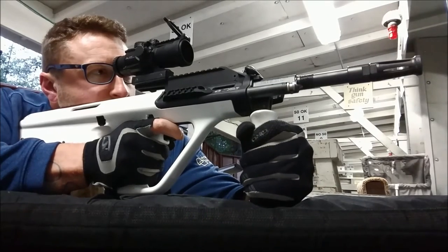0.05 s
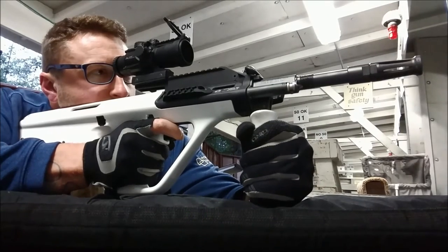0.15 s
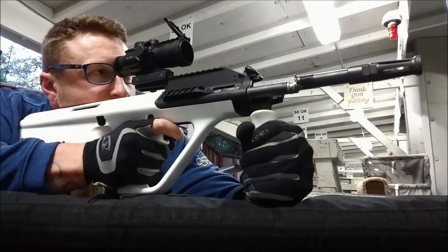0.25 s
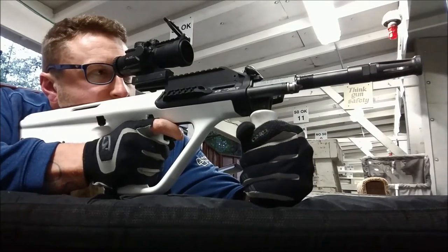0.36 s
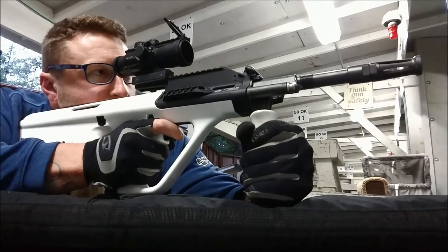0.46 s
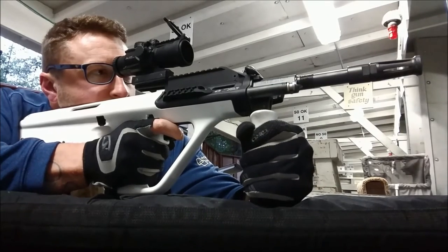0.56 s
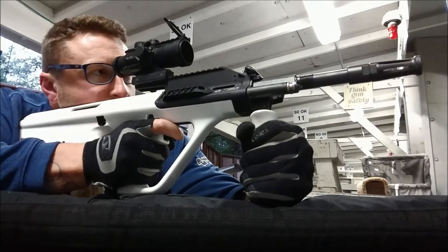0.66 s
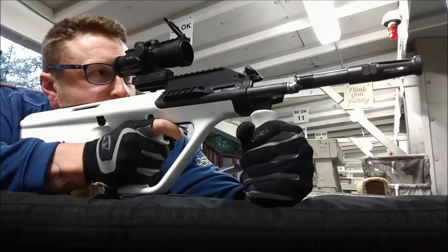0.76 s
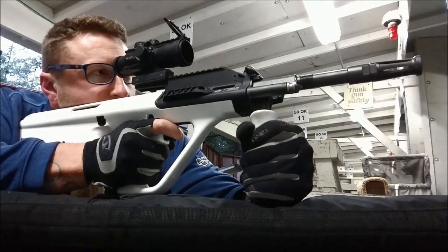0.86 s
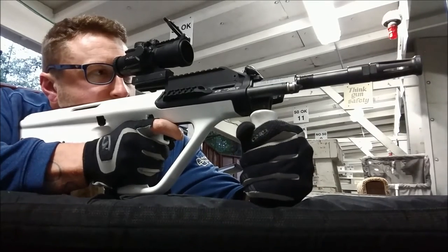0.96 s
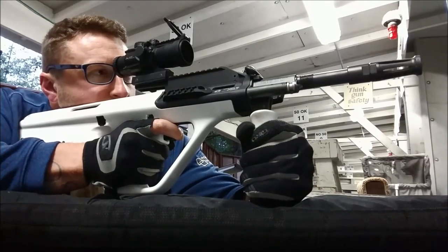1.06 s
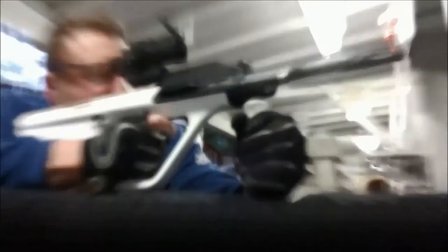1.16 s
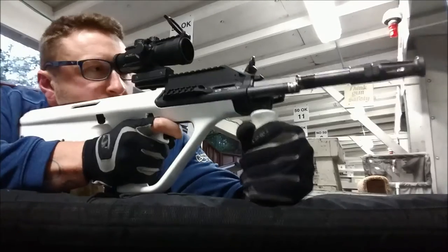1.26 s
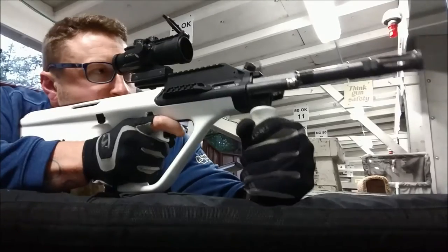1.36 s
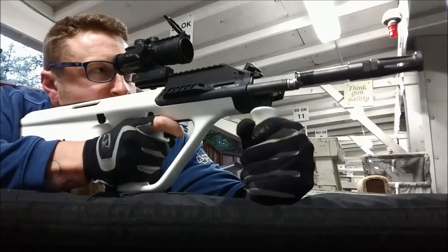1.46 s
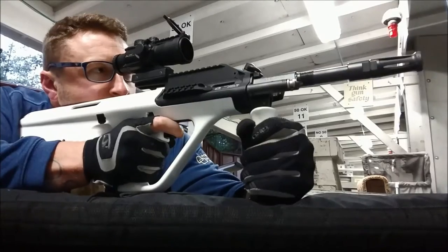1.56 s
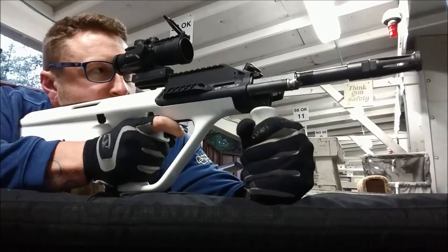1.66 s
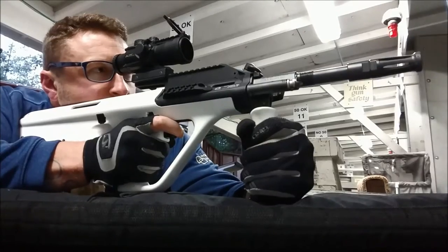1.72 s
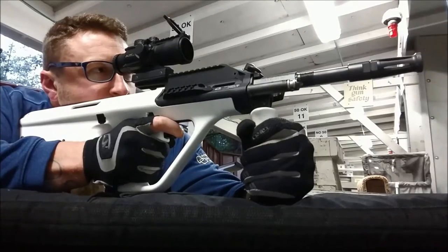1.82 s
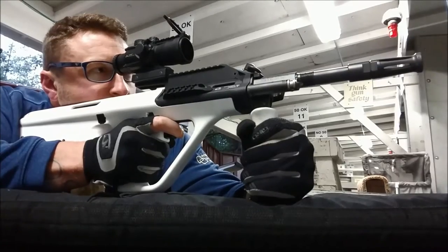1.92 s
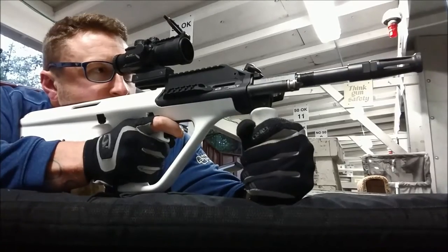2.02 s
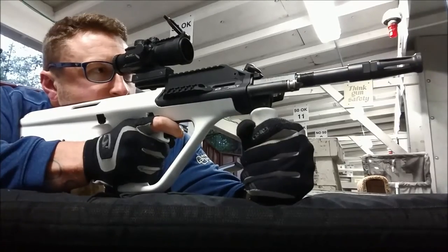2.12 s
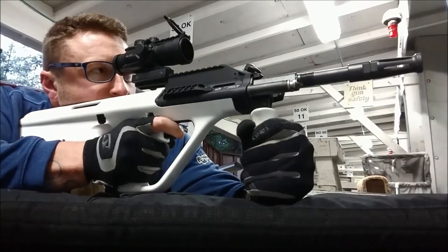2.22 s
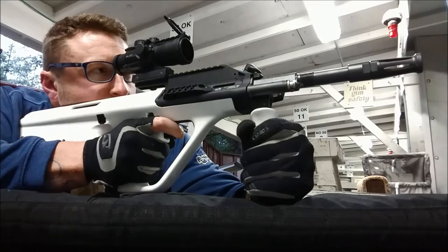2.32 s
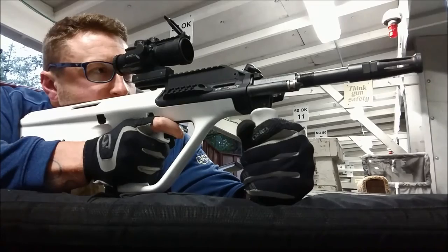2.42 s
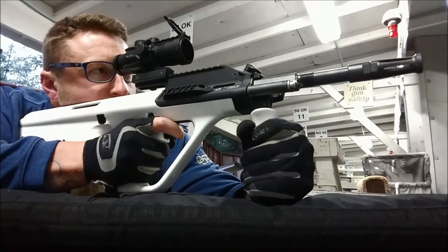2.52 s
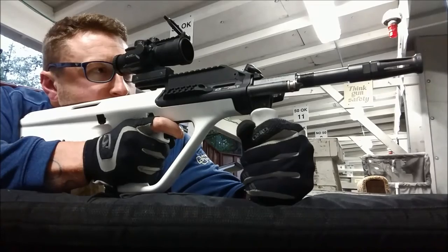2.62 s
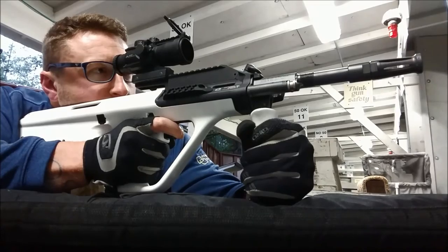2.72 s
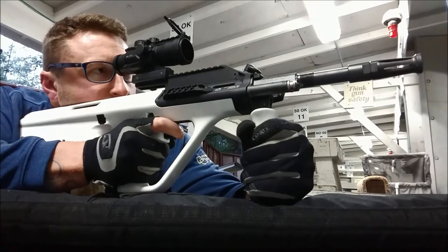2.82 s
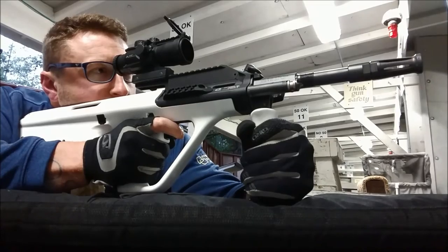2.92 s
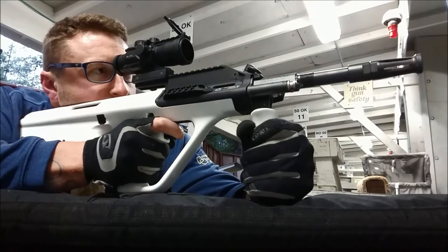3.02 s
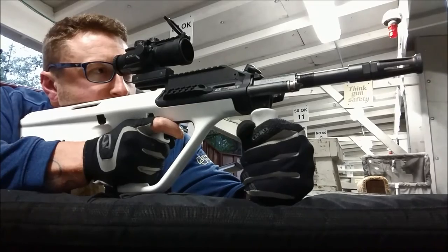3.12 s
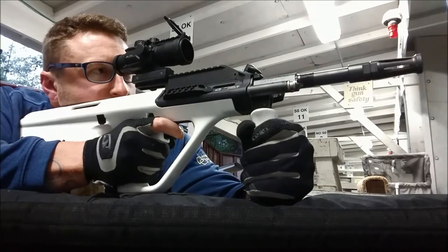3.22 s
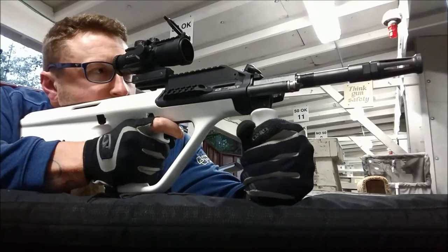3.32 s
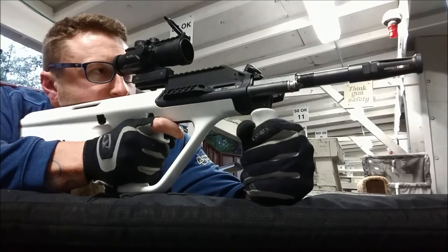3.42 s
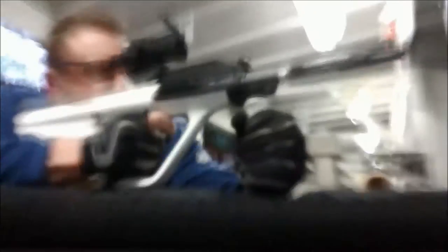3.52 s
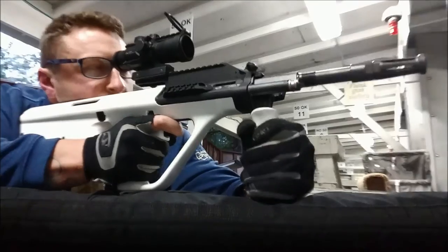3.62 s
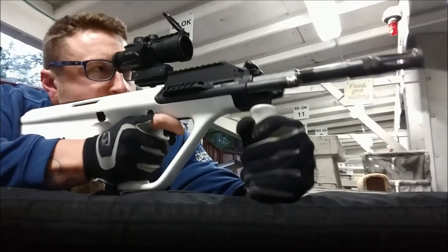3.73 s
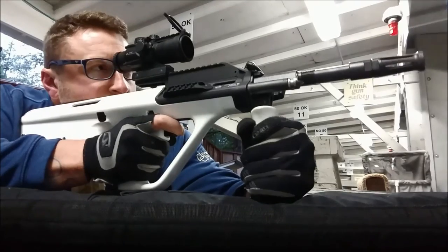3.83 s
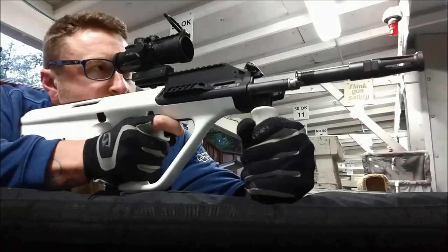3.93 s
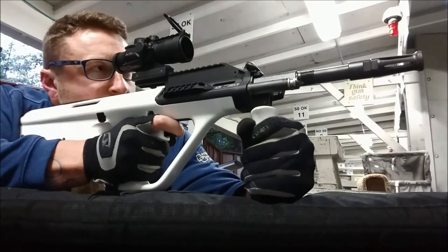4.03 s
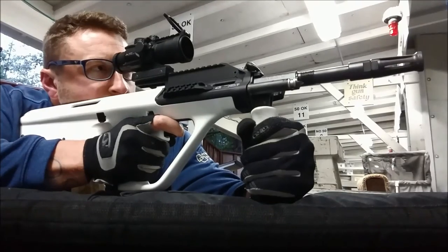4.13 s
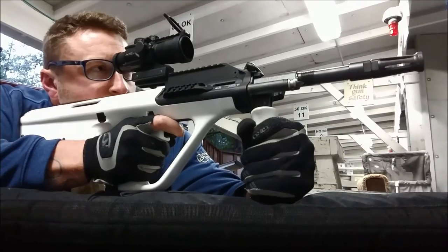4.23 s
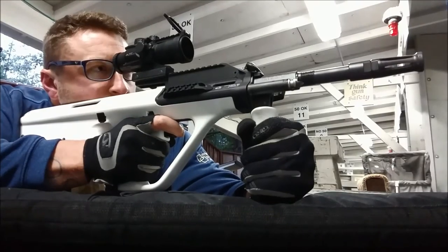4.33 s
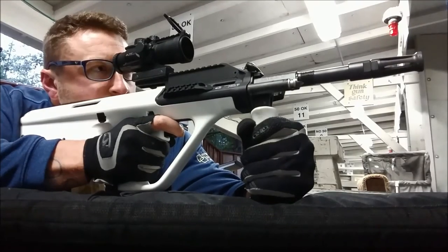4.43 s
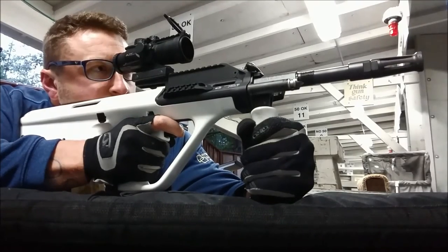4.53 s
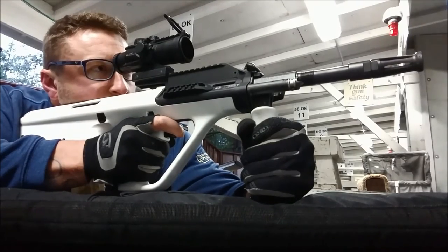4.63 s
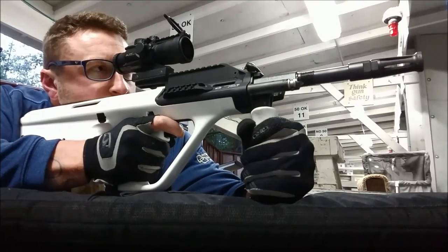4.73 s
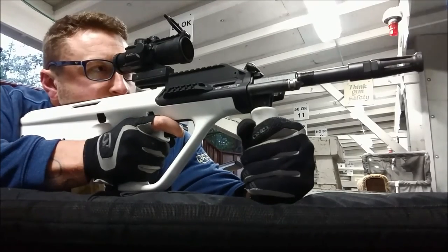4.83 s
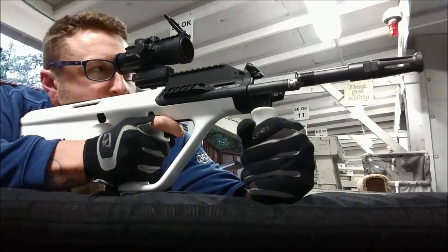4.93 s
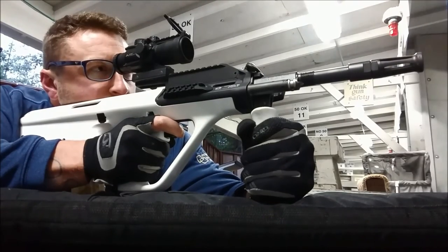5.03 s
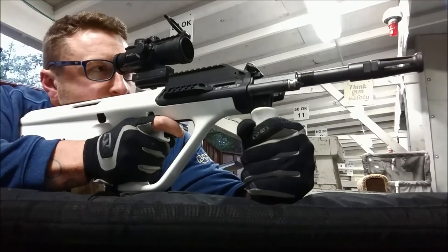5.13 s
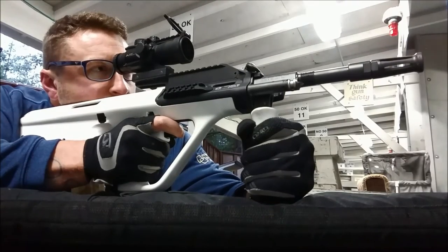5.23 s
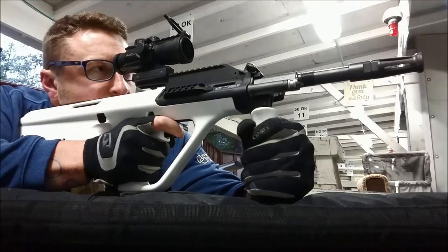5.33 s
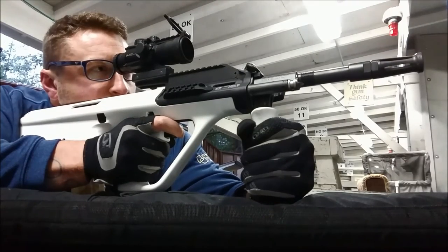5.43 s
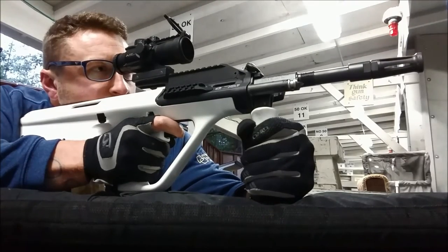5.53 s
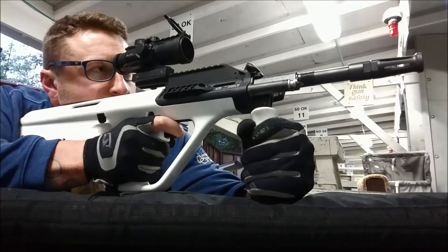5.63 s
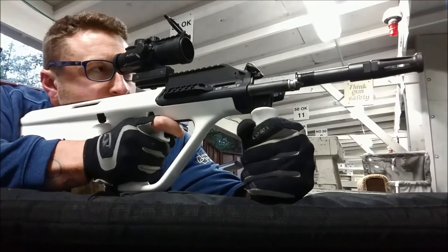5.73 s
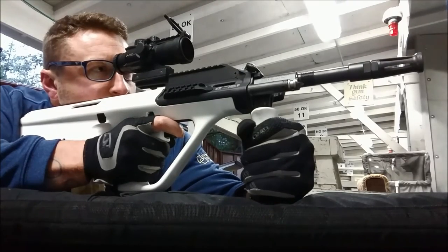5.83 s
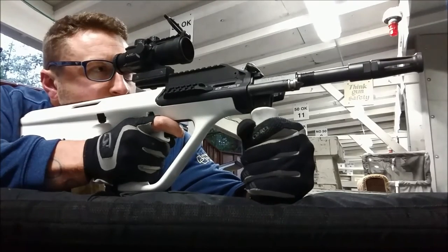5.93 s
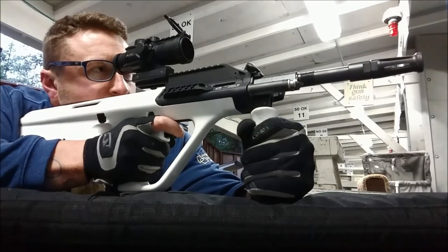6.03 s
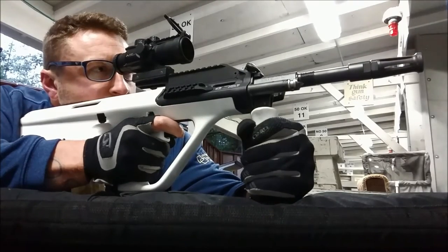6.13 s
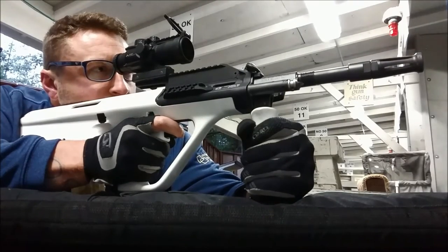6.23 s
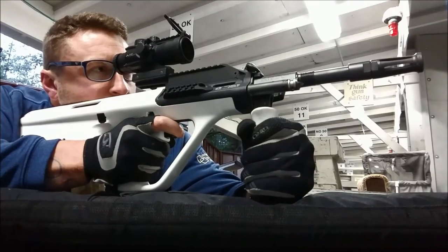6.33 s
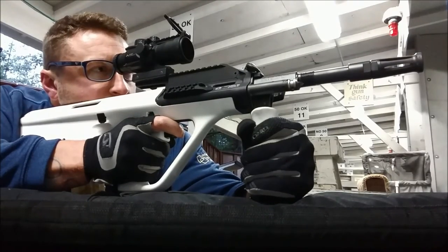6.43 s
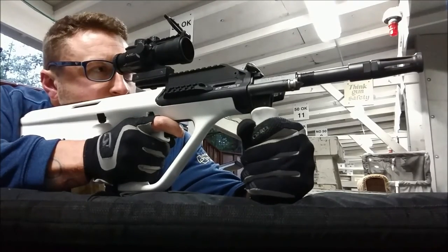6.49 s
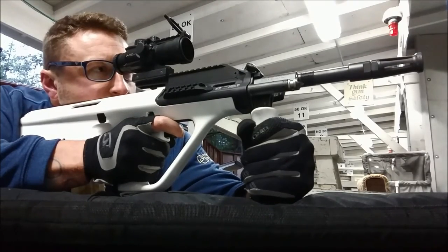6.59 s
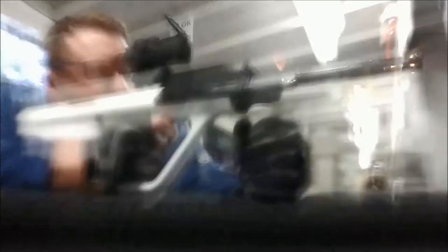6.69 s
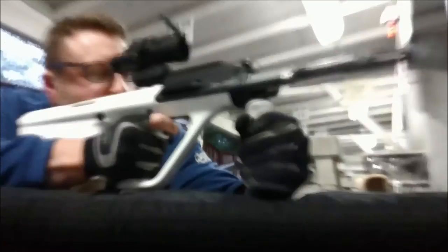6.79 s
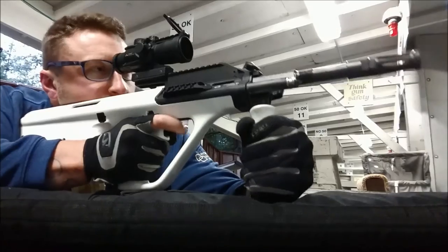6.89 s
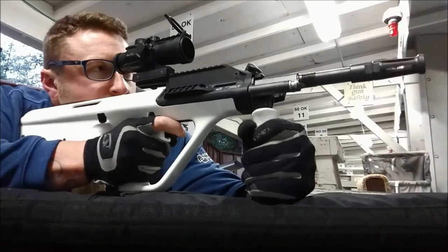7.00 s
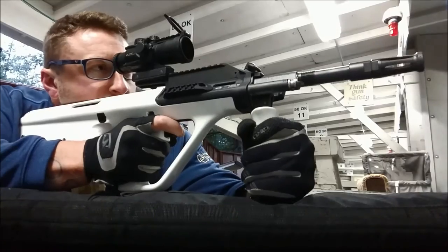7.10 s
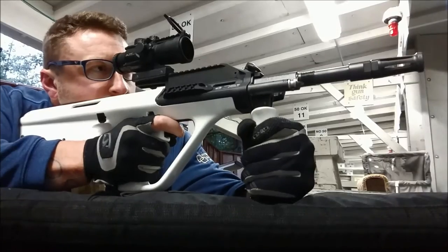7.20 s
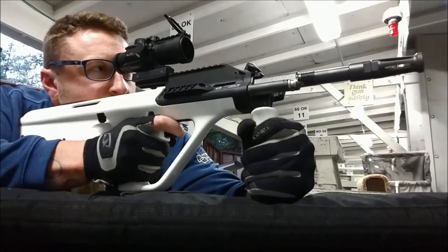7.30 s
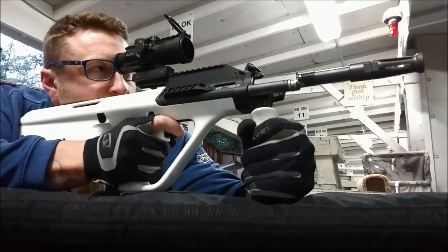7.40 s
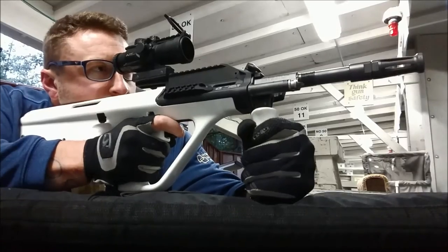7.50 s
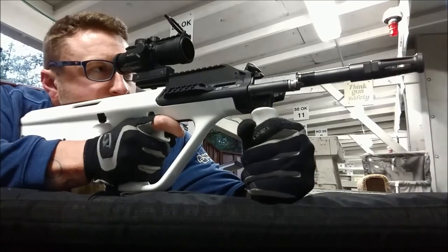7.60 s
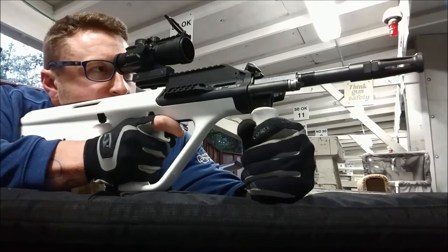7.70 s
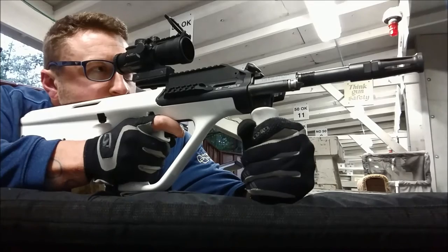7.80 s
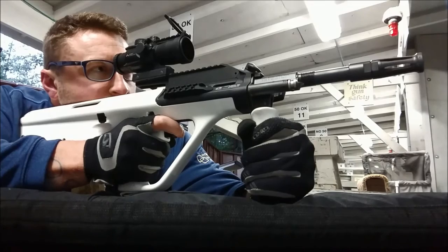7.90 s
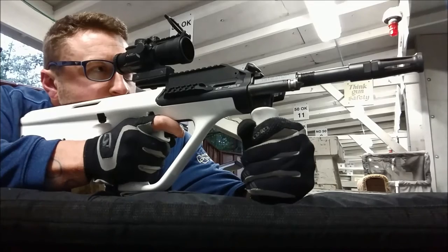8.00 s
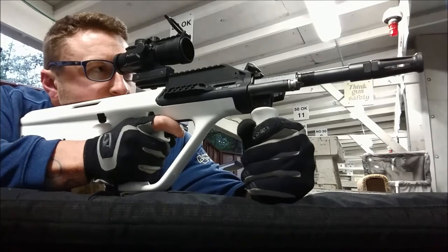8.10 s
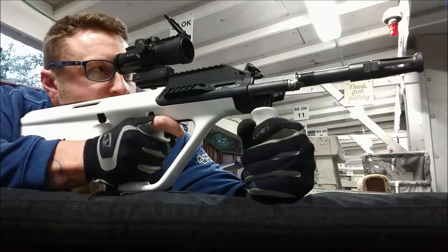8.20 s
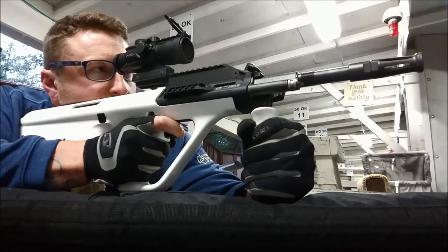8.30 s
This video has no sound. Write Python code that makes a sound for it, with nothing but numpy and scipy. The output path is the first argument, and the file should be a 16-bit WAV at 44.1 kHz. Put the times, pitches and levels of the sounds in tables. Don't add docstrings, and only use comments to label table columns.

```python
import sys
import numpy as np
from scipy import signal
from scipy.fft import rfft, irfft, next_fast_len
from scipy.io import wavfile
from scipy.ndimage import map_coordinates

SR = 44100
rng = np.random.default_rng(int(sys.argv[2]) if len(sys.argv) > 2 else 0)


def ratio_of_db(decibels):
    return 10 ** (np.asarray(decibels, float) / 20)


def wav_record(signal):
    frames = np.transpose(np.atleast_2d(signal))
    bounded = np.clip(frames, -1, 1)
    quanta = np.round(bounded * 32767).astype(np.int16)
    wavfile.write(sys.argv[1], SR, quanta)


N = 368235
LEFT_LAG_S = 18.5 / SR

# (time [s], charge level [dB], left capsule wakes after the shot [s])
SHOTS = [
    (-0.95, 0, 0.11),
    (1.1615, 0, 0.111),
    (3.542, 0, 0.122),
    (6.7592, 1, 0.114),
]
# (time after ignition [s], level [dB], half length [s], sign, left minus right [dB])
BLAST = [
    (0.0006, -17, 0.0003, 1, -4),
    (0.0018, -14, 0.0003, -1, -4),
    (0.0031, 10, 0.0006, -1, 0),
    (0.0038, 13, 0.0011, 1, 0),
    (0.0058, 20, 0.0004, 1, -2),
    (0.0078, 10, 0.00025, 1, -12),
    (0.0101, 6, 0.0003, 1, -14),
    (0.0134, 8, 0.0004, 1, 2),
]
# (time after ignition [s], pitch [Hz], cycles, level [dB], left minus right [dB])
SLAPS = [(0.144, 1900, 2.5, -6, 2), (0.15, 620, 2.5, 1, 3), (0.187, 500, 1.5, -5, 4),
         (0.125, 900, 2, -1, -4), (0.2, 120, 7, -12, 0), (0.2395, 1500, 2.2, 5, 7),
         (0.2435, 300, 0.8, -4, 6), (0.2395, 4300, 4, -3, 4), (0.277, 8000, 1.5, -17, 3),
         (0.287, 12000, 1.5, -17, -6), (0.25, 48, 5, -18, 0), (0.585, 150, 5, -28, 0)]
# (frequency [Hz], level [dB per Hz])
ROOF_TONE = [(18, -40), (40, -13), (125, -1), (206, -7), (359, -5), (620, -4), (1150, -12), (1890, -18),
             (4300, -27), (8000, -30), (12500, -29), (15500, -38), (16500, -60)]
# (frequency [Hz], level [dB per Hz])
FIELD_TONE = [(18, -31), (45, -4), (86, -20), (150, -2), (300, -13), (625, -10), (850, -10), (1050, -19),
              (1400, -15), (2100, -18), (4400, -24), (4800, -30), (13400, -54), (16500, -76)]
# (frequency [Hz], roof t60 [s], field t60 [s])
DECAY = [(40, 0.9, 1.4), (120, 0.62, 2.4), (400, 0.54, 2.9), (1200, 0.57, 2.7), (4000, 0.55, 1.7),
         (9000, 0.55, 0.95), (16000, 0.38, 0.55)]
# (frequency [Hz], share [0-1])
ALIKE = [(50, 0.85), (150, 0.9), (350, 0.75), (800, 0.42), (1800, 0.35), (5000, 0.2), (15000, 0.2)]
# (frequency [Hz], left minus right [dB])
LEAN = [(60, 0.0), (110, -0.5), (200, -1.0), (380, -0.5), (700, -0.5), (1290, 1.5), (2380, -5.0),
        (4400, -4.5), (8120, 1.5), (15000, 0.5)]
# (time after shot [s], pitch [Hz], cycles, level [dB], left minus right [dB])
NEIGHBOUR_SLAPS = [
    (0.004, 600, 2.4, 3, -3),
    (0.009, 2600, 6, -11, -2),
    (0.012, 70, 1.2, -15, 0),
    (0.0185, 6000, 1.2, -2, 3),
    (0.0175, 3500, 2, -5, 0),
    (0.021, 600, 2, -2, 0),
    (0.04, 700, 4, -5, -2),
    (0.06, 9000, 1.5, -6, 3),
    (0.09, 4500, 1.5, -9, 2),
    (0.109, 6000, 1.3, -8, 2),
]
# (frequency [Hz], level [dB per Hz])
NEIGHBOUR_TONE = [(18, -44), (30, -18), (196, -6), (420, -6), (680, -2), (953, -7), (1490, -9), (3000, -17),
                  (12300, -27), (15200, -34), (16500, -51)]
# (time [s], strength [dB], low over high ring [dB]: up on its mouth, down on its base)
BOUNCES = [(0.0034, -47, -4), (0.0744, -54, -3), (0.2034, -56, -3), (1.786, -28, -15), (1.8542, -44, -14),
           (2.124, -48, -17), (2.148, -47, -22), (2.1844, -51, -28), (2.277, -44, -17), (4.1839, -34, -3),
           (4.2048, -35, -2), (4.4318, -55, -8), (4.4767, -36, -22), (4.5326, -43, -26), (4.6159, -57, -23),
           (4.6794, -36, -17), (4.6877, -30, -26), (4.8958, -52, -17), (4.9621, -48, 12), (4.995, -48, 11),
           (5.0394, -53, 1), (5.2265, -62, -1), (5.3094, -60, 0), (7.4031, -31, 5), (7.4145, -28, 8),
           (8.076, -58, -6), (8.1384, -54, -15), (8.1753, -52, -18), (8.313, -50, -8)]
# (frequency [Hz], level [dB], t60 [s])
LOW_RING = [(10620, -2, 0.33), (10770, 0, 0.3), (10930, -12, 0.25)]
# (frequency [Hz], level [dB], t60 [s])
HIGH_RING = [(14860, -12, 0.24), (14950, -8, 0.3), (15050, 0, 0.26), (15170, -8, 0.3), (15310, -12, 0.2)]
# (frequency [Hz], level [dB], t60 [s])
BENCH_RING = [(1350, -4, 0.4), (1850, -3, 0.35), (2315, -5, 0.5), (2546, 1, 0.35), (3080, 1, 0.3),
              (4673, -11, 0.65), (4953, -12, 0.35), (5620, -3, 0.4), (6272, -7, 0.45), (6783, -9, 0.45),
              (7994, -6, 0.12), (9022, -8, 0.14)]
# (time [s], centre [Hz], length [s], level [dB])
RUSTLES = [(0.675, 9000, 0.012, -70), (1.14, 1400, 0.006, -48), (2.6, 2500, 0.01, -68),
           (2.76, 2100, 0.01, -64), (2.99, 2800, 0.016, -62), (3.05, 5500, 0.04, -70),
           (3.33, 3000, 0.01, -60), (3.523, 1500, 0.004, -42), (6.11, 2500, 0.02, -66),
           (6.32, 600, 0.07, -62), (6.33, 2600, 0.07, -70), (6.38, 70, 0.09, -56), (5.6, 75, 0.2, -60),
           (6.56, 6000, 0.022, -67), (6.741, 1100, 0.005, -37)]
# (time [s], pitch [Hz], cycles, level [dB], left minus right [dB])
SQUEAKS = [
    (5.725, 2150, 90, -64, 0),
    (5.985, 1500, 12, -58, 0),
]
# (frequency [Hz], level [dB per Hz])
AIR_TONE = [(18, -12), (40, 2), (120, 0), (200, -5), (400, -10), (800, -12), (1050, -19), (2000, -22),
            (3200, -30), (5000, -35), (8000, -36), (13000, -31), (15500, -33), (16500, -55)]
# (time after ignition [s], pitch [Hz], cycles, level [dB], left minus right [dB])
SQUEAL = [
    (0.004, 12500, 8, -9, 0),
    (0.0052, 14000, 8, -11, -4),
    (0.0845, 15300, 20, -36, -40),
    (0.086, 12500, 12, -33, -40),
    (0.0875, 14500, 10, -35, -40),
]


def read(table, hz):
    x, *columns = np.transpose(table)
    return [np.interp(np.log(hz), np.log(np.maximum(x, 1)), c) for c in columns]


def add(out, x, at_s, pan_db=0):
    mono = x.ndim == 1
    for ch, (lag_s, sign) in enumerate([(LEFT_LAG_S, 1), (0, -1)]):
        one = x if mono else x[ch]
        start = int(round((at_s + (lag_s if mono else 0)) * SR))
        a, b = np.clip([start, start + len(one)], 0, out.shape[1])
        out[ch, a:b] += one[a - start:b - start] * ratio_of_db(sign * pan_db / 2)


def diffuse(size):
    hz = np.maximum(np.arange(size // 2 + 1) * SR / size, 1)
    both, left, right = rfft(rng.standard_normal((3, size)))
    share = np.clip(read(ALIKE, hz)[0], 0, 1)
    lean = ratio_of_db(read(LEAN, hz)[0] / 2)
    late = np.exp(-2j * np.pi * hz * LEFT_LAG_S)
    shared = both * np.array([late * lean, 1 / lean])
    own = np.array([left * lean, right / lean])
    return np.sqrt(share) * shared + np.sqrt(1 - share) * own


def colour(table, hz):
    gain = ratio_of_db(read(table, hz)[0])
    return gain[:, None] / np.sqrt(np.mean(gain ** 2))


def shape(spectrum, gain):
    hz, t, frames = signal.stft(irfft(spectrum), SR, nperseg=1024)
    return signal.istft(frames * gain(np.maximum(hz, 1), t), SR, nperseg=1024)[1]


def space(noise, tone, roof_db, field_db, hold_s=0, quick=1, rise_s=0.007):
    def gain(hz, t):
        roof_s, field_s = np.array(read(DECAY, hz))[:, :, None]
        roof = colour(tone, hz) * ratio_of_db(roof_db - 60 * np.maximum(t - hold_s, 0) / roof_s / quick)
        field = colour(FIELD_TONE, hz) * ratio_of_db(field_db - 60 * (t - 0.5) / field_s)
        return np.hypot(roof, field * (1 - np.exp(-(t / 0.15) ** 2)))
    out = shape(noise, gain)
    age = np.maximum(np.arange(out.shape[1]) / SR - 0.003, 0)
    return out * (1 - np.exp(-age / rise_s))


def slap(out, at_s, rows):
    for s, hz, cycles, db, pan_db in rows:
        half = cycles / hz / 2
        t = np.arange(-3 * half, 3 * half, 1 / SR)
        burst = -ratio_of_db(db) * np.exp(-(t / half) ** 2) * np.cos(2 * np.pi * hz * t)
        add(out, burst, at_s + s - 3 * half, pan_db)


def ring(modes, db, chance, size=13000):
    hz, mode_db, t60 = np.transpose(modes)[:, :, None]
    t = np.arange(size) / SR
    chance = chance[:len(modes)]
    level = ratio_of_db(mode_db + 2.5 * chance[:, :1] - 60 * t / t60)
    lines = level * np.sin(2 * np.pi * hz * (1 + 0.0015 * chance[:, 1:2]) * t)
    return ratio_of_db(db) * lines.sum(axis=0) * (1 - np.exp(-t / 0.003))


def tick(db, lo_hz, t60, size=8820):
    t = np.arange(size) / SR
    noise = signal.lfilter(*signal.butter(2, lo_hz, "high", fs=SR), rng.standard_normal((2, size)))
    return noise * (ratio_of_db(db + 5 - 60 * t / t60) + ratio_of_db(db + 9 - 60 * t / 0.012))


def air(count=80, channels=12):
    level_db, flutter_db = -55, 3.0
    steps = rng.standard_normal((channels, count))

    def gain(hz, t):
        band = np.log2(np.maximum(hz / 40, 1)) * 1.3
        place = np.meshgrid(band, t / t[-1] * (count - 1), indexing="ij")
        flutter = map_coordinates(steps, place, order=1, mode="nearest")
        depth_db = flutter_db * np.minimum(1, 600 / hz)[:, None]
        return colour(AIR_TONE, hz) * ratio_of_db(level_db + depth_db * flutter)
    return shape(diffuse(next_fast_len(N + N % 2, True)), gain)[:, :N].copy()


def rustles(out, size=16384):
    slap(out, 0, SQUEAKS)
    for s, hz, length, db in RUSTLES:
        t = np.arange(size) / SR - 2 * length
        band = signal.butter(2, [hz / 1.8, hz * 1.7], "band", fs=SR)
        noise = signal.lfilter(*band, rng.standard_normal(size))
        puff = np.exp(-np.where(t < 0, 3 * t * t, t * t) / length ** 2)
        add(out, noise / noise.std() * ratio_of_db(db) * puff, s - 2 * length, -2)


def cases(out):
    last = -0.04
    earlier = ring(LOW_RING, -35, np.zeros((3, 2))) + ring(HIGH_RING, -43, np.zeros((5, 2)))
    add(out, earlier, last, -3)
    full_flight_s = 0.25
    for s, db, tilt_db in BOUNCES:
        flight = np.clip(s - last, 0.005, full_flight_s)
        last = s
        chance = rng.standard_normal((2, len(LOW_RING + HIGH_RING), 2))
        low_db, high_db = db + min(tilt_db, 0) - 1, db - max(tilt_db, 0) + 3
        brass = [ring(LOW_RING, low_db, ear) + ring(HIGH_RING, high_db, ear[::-1]) for ear in chance]
        pan_db = -4.5 + 1.5 * rng.standard_normal()
        add(out, np.array(brass), s, pan_db)
        tick_db = -49 + 0.6 * (db + 40) + 13 * np.log10(flight / full_flight_s)
        add(out, tick(tick_db, 4200, 0.19), s, pan_db)


def neighbour_case(out):
    s, ring_db, thud_db, tick_db = 7.9436, -32, -23, -33
    add(out, ring(BENCH_RING, ring_db, 0.3 * rng.standard_normal((len(BENCH_RING), 2))), s, -3)
    add(out, ring([(230, 0, 0.12)], thud_db, np.zeros((1, 2))), s)
    add(out, tick(tick_db, 3000, 0.25), s, -3)
    dull = signal.butter(2, 2900, fs=SR)
    add(out, signal.lfilter(*dull, tick(tick_db + 7, 900, 0.8, size=17000)), s, -3)


def neighbour(out):
    s, roof_db, field_db, pan_db = 7.5425, -10.5, -40, -2
    roar = space(diffuse(size=49152), NEIGHBOUR_TONE, roof_db, field_db, hold_s=0.08, quick=0.72, rise_s=0.004)
    add(out, roar, s, pan_db)
    slap(out, s, NEIGHBOUR_SLAPS)


def rifle(out, size=512):
    fresh = 0.2
    place = diffuse(size=147456)
    for s, db, _ in SHOTS:
        echoes = np.sqrt(1 - fresh) * place + np.sqrt(fresh) * diffuse(size=147456)
        shot = space(echoes, ROOF_TONE, roof_db=6, field_db=-30)
        for after, pulse_db, half, sign, pan_db in BLAST:
            t = np.arange(size) / SR / half
            front = (1 - t) * np.exp(-t)
            jet = 0.6 * t * np.exp(-t) * np.diff(rng.standard_normal(size + 1))
            add(shot, sign * ratio_of_db(pulse_db) * (front + jet), after, pan_db)
        slap(shot, 0, SLAPS)
        add(out, shot * ratio_of_db(db), s)


def scene():
    out = air()
    for source in (rustles, cases, neighbour_case, neighbour, rifle):
        source(out)
    return out


def pair(left, right):
    return np.array([[left], [right]], float)


def capsules(size=16384):
    age = np.arange(size) / SR
    gain_db, offset, loss = np.zeros((3, 2, N))
    sag_db = pair(-7, -10) * (1 - np.exp(-age / pair(0.02, 0.06)))
    fainting = 1 - np.exp(-np.maximum(age - pair(0.063, 0.04), 0) / pair(0.008, 0.011))
    faint = ratio_of_db(sag_db + (pair(-110, -52) - sag_db) * fainting)
    faint[1] += ratio_of_db(-34) * (age > 0.069)
    faint[1] += ratio_of_db(-17) * np.exp(-((age - 0.0752) / 0.0004) ** 2)
    push_s = 0.0049
    pinned = pair(2.5, 1.6) * (age > push_s) * np.exp(-abs(age - push_s) / pair(0.0065, 0.005))
    swing = 0.22 * np.exp(-((age - pair(0.069, 0.063)) / 0.006) ** 2)
    for s, _, left_wake in SHOTS:
        since = age - pair(left_wake, 0.0805)
        waking_db = pair(-20, 5) * np.exp(-abs(since) / pair(0.012, 0.007))
        add(gain_db, np.where(since >= 0, waking_db, 20 * np.log10(faint)), s)
        add(offset, -(pinned + swing), s)
        add(loss, pair(0, 0.85) * (since >= 0) * np.exp(-abs(since) / 0.03), s)
    return ratio_of_db(gain_db), offset, np.clip(1 - loss, 0.02, 1)


def roll_off(x):
    return signal.sosfilt(signal.butter(12, 16970, fs=SR, output="sos"), x)


def record(dry):
    keep = np.exp(-1 / (0.016 * SR))
    power = signal.lfilter([1 - keep], [1, -keep], np.mean(dry ** 2, axis=0))
    control = (1 + (power / ratio_of_db(-11.5) ** 2) ** 2) ** -0.23
    gain, offset, headroom = capsules()
    x = dry * control * gain * ratio_of_db(2.2) + offset
    x = np.where(x > 0, headroom * np.tanh(x / headroom), np.tanh(x))
    for s, *_ in SHOTS:
        slap(x, s, SQUEAL)
    x = signal.lfilter(*signal.butter(2, 38, "high", fs=SR), x)
    x = np.clip(0.74 * x, -0.85, 0.85)
    x = signal.sosfilt(signal.ellip(8, 0.5, 60, 15900, fs=SR, output="sos"), x)
    return roll_off(x)


dry = scene()
out = record(dry)
wav_record(out)
```